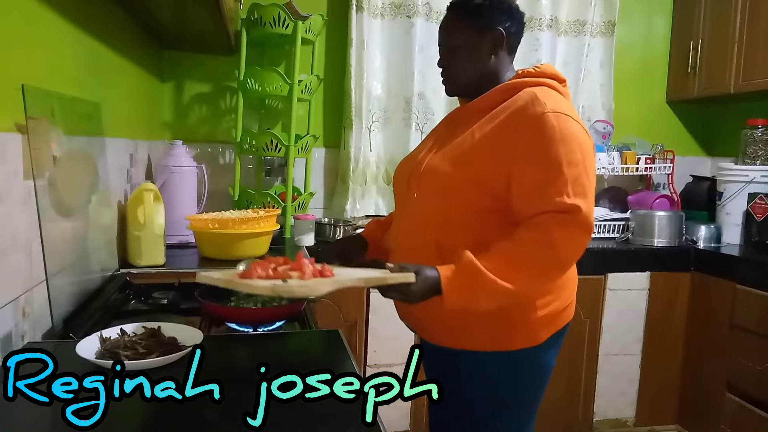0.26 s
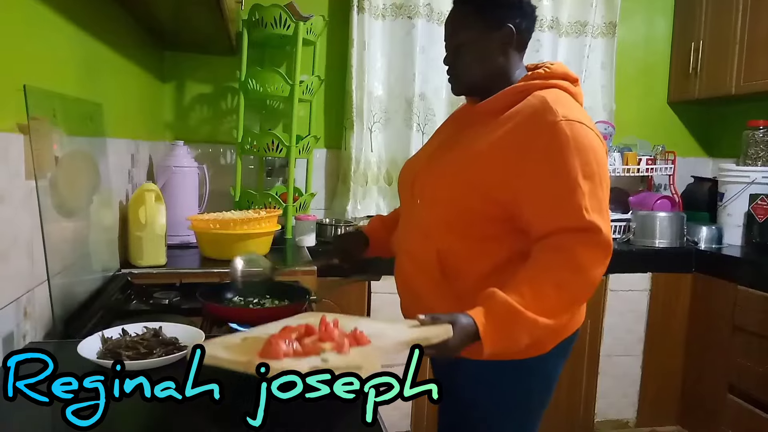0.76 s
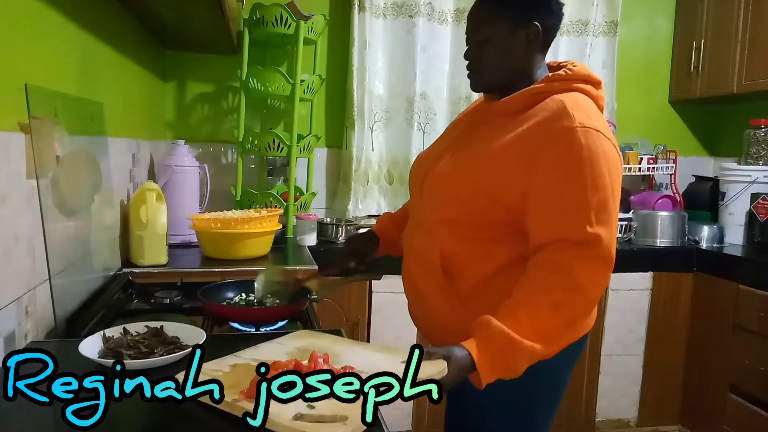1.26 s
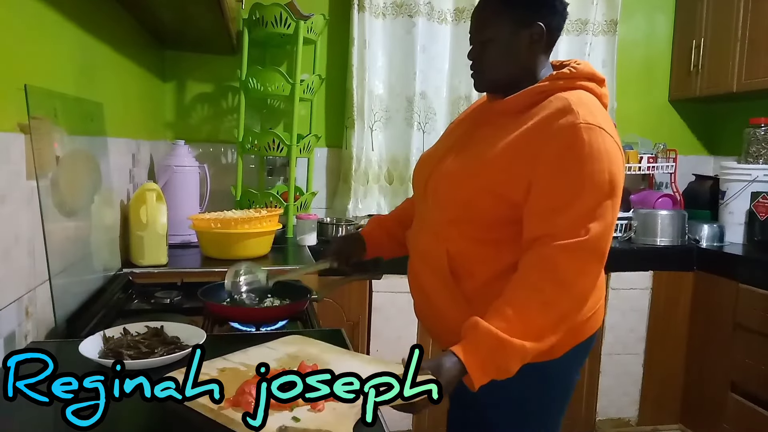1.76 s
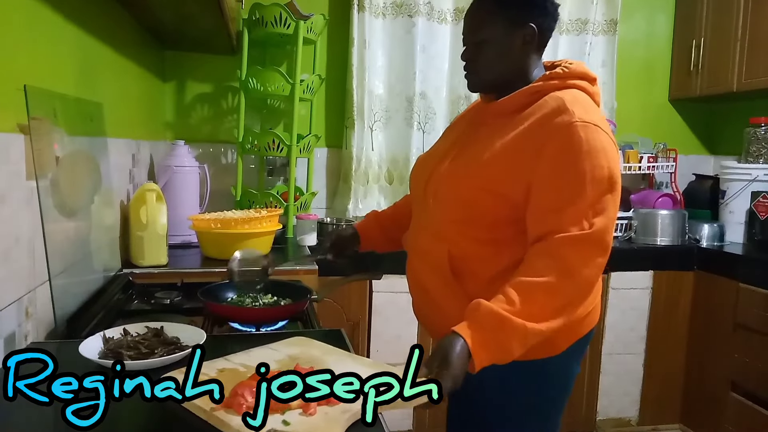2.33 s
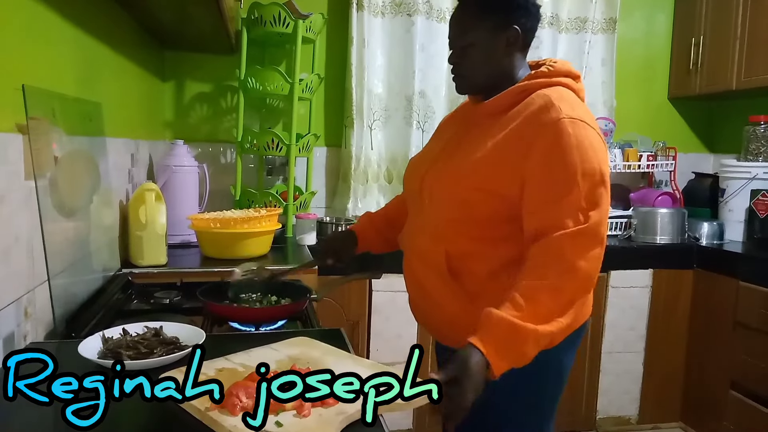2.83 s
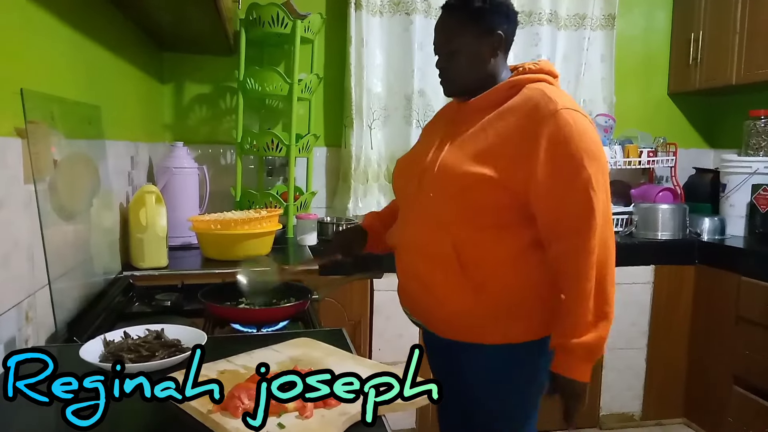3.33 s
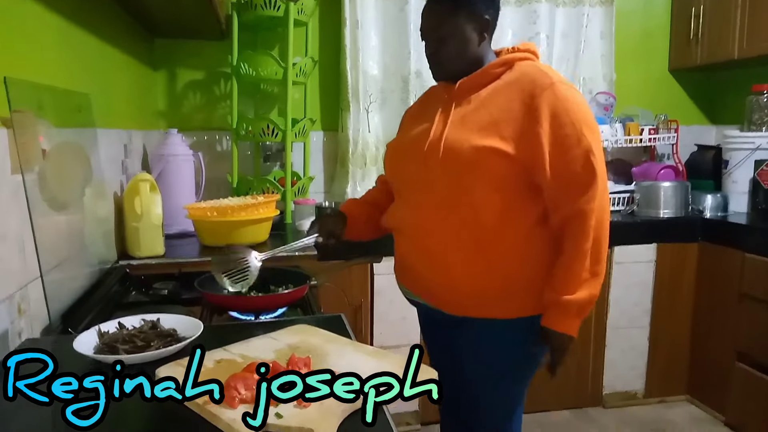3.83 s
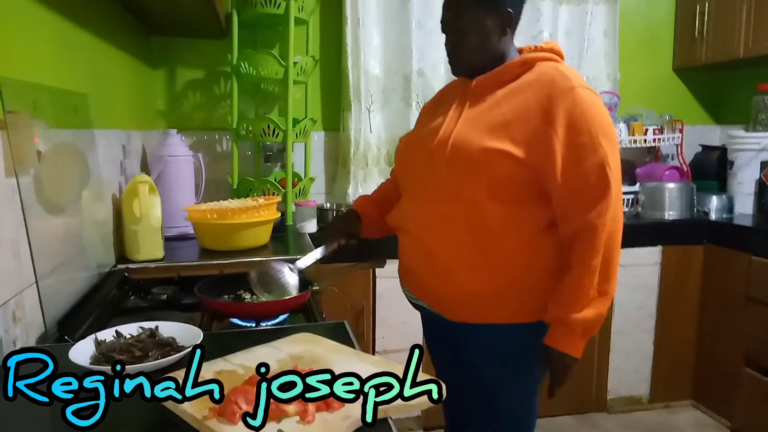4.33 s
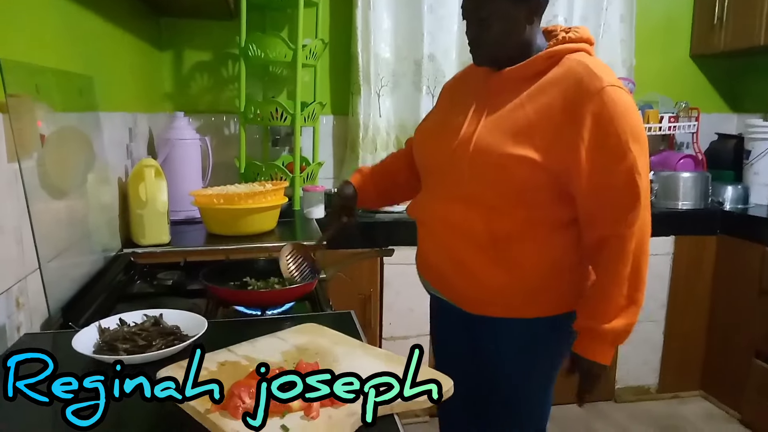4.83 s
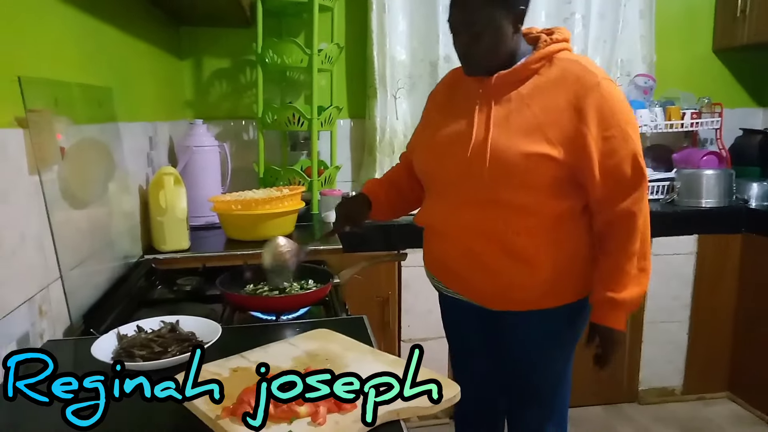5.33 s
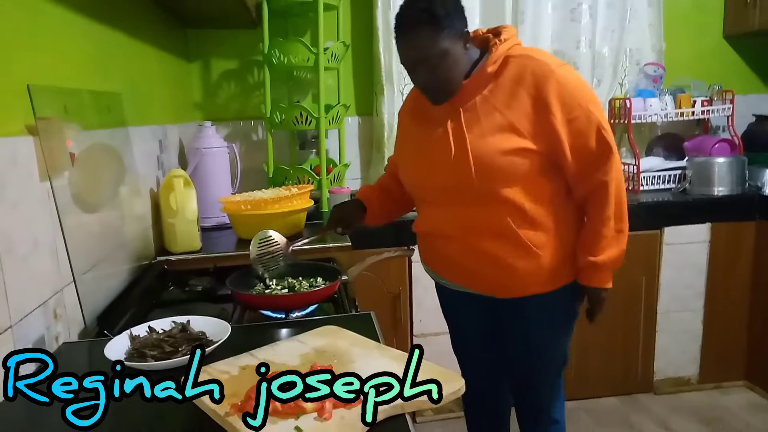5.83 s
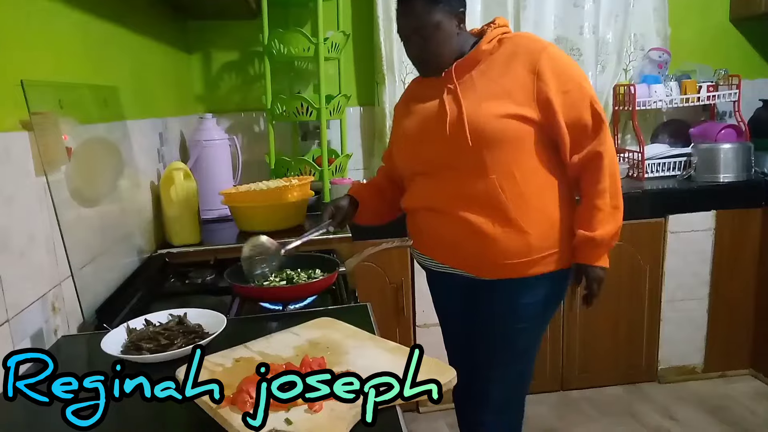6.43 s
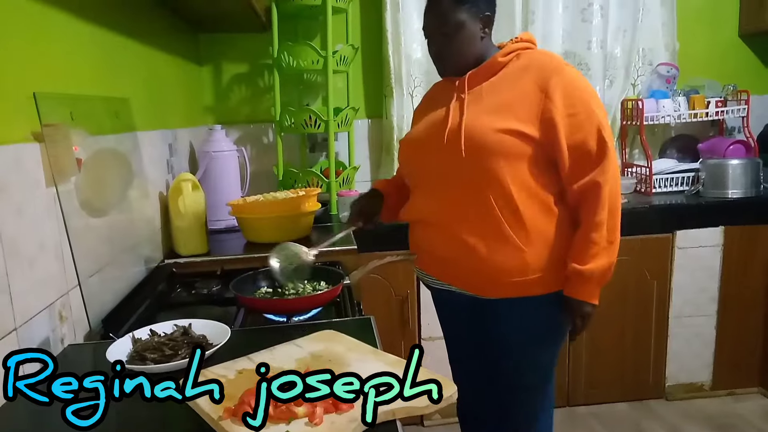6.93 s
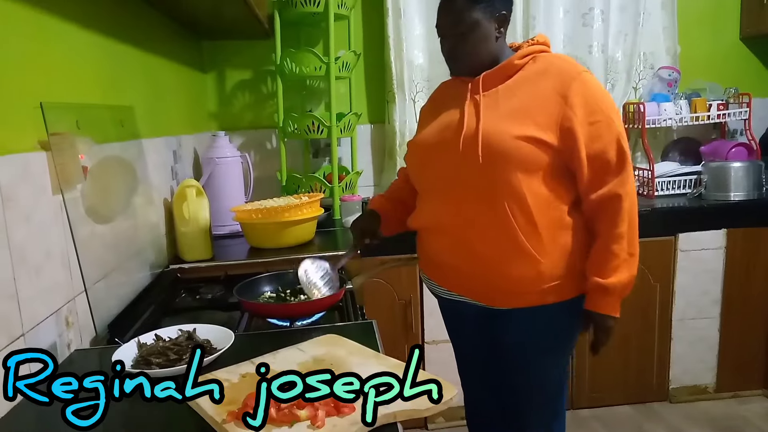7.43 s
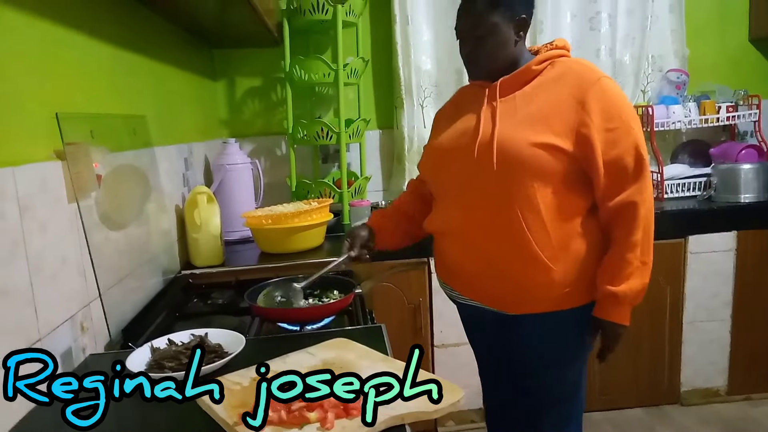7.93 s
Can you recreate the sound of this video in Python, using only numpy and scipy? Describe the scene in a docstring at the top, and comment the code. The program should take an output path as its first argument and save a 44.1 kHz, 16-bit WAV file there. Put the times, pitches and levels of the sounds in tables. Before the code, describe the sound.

Throughout about eight seconds, oil sizzles finely and quietly with small crackles over a soft, low gas-flame roar. A metal spoon clanks once in the pan at 0.4 s, with light brushing before and after. At about 1.0 s a wooden board touches, then lands with a hard hollow clack at 1.3 and rocks with a double knock near 1.55. Soft onion turning follows, with a tap at 2.6 and a stronger knock and scrape at 3.0. Lighter stirring leads to a low dragging contact at 3.9, a bright ringing clank at 4.35 and another at 4.65. From 5 to 6.3 mostly sizzle and faint rustles. Sharp knocks with scrapes come at 6.35 and 6.8, the brightest at 7.4, then smaller taps and drags at 7.65 to 7.8. Rings are short and choked; the room is small, hard and close, in mono.

```python
"""A slotted metal spoon lands in a frying pan and is dragged through onions: blows and friction grains ring
the modes of pan and spoon. Early on a wooden board is set down on the counter and rocks, driven the same way.
Oil sizzles as filtered clicks and ringing steam pockets; a gas flame roars over a rumble that answers blows.
A small hard kitchen adds a noise tail; one mono microphone, noise suppressor and cut top shape the sound."""
import sys
import numpy as np
from scipy import signal
from scipy.fft import rfft, irfft
from scipy.io import wavfile
from scipy.ndimage import uniform_filter1d

SR = 44100
rng = np.random.default_rng(int(sys.argv[2]) if len(sys.argv) > 2 else 0)


def materialize(psi):
    """Save the field psi as 16-bit PCM at rate SR to the path in sys.argv[1].

    A 1-D psi becomes a single channel; in a 2-D psi each row is a channel.
    """
    bounded = np.clip(np.atleast_2d(psi).T, -1, 1)
    quanta = np.round(bounded * 32767).astype(np.int16)
    wavfile.write(sys.argv[1], SR, quanta)


N = 360286   # samples


def from_db(db):
    """Gain of a level in dB."""
    return 10 ** (np.asarray(db) / 20)


def rms_one(x):
    """Scaled to rms 1."""
    return x / np.sqrt(np.mean(x ** 2) + 1e-20)


def at_hz(points, hz):
    """A table read on a log-frequency axis."""
    points_hz, values = np.transpose(points)
    return np.interp(np.log(hz), np.log(points_hz), values)


def bandpass(x, order, low_hz, high_hz):
    """Butterworth band."""
    return signal.sosfilt(signal.butter(order, [low_hz, high_hz], "band", fs=SR, output="sos"), x)


def colour(x, spectrum):
    """Causal filter shaped like the spectrum, unit energy (minimum phase from the folded cepstrum)."""
    size = 4096
    hz = np.maximum(np.fft.rfftfreq(size, 1 / SR), 1)
    cepstrum = irfft(at_hz(spectrum, hz) * np.log(10) / 20)
    cepstrum[1:size // 2] *= 2
    cepstrum[size // 2 + 1:] = 0
    response = irfft(np.exp(rfft(cepstrum)))
    return signal.fftconvolve(x, rms_one(response) / np.sqrt(size))[:N]


def drift(rate_hz):
    """Slow random wander of rms 1: noise through a two-pole lowpass, made at SR / 40."""
    r = np.exp(-80 * np.pi * rate_hz / SR)
    noise = rng.standard_normal(N // 40 + 2002)
    slow = signal.lfilter([1], [1, -2 * r, r * r], noise)[2000:]   # the start-up is dropped
    return np.interp(np.arange(N) / 40, np.arange(len(slow)), rms_one(slow))


def resonate(x, hz, width_hz):
    """One mode as a two-pole resonator; white noise of rms 1 comes out at rms 1."""
    r = np.exp(-np.pi * width_hz / SR)
    gain = np.sqrt((1 - r * r) / 2)
    return signal.lfilter([gain, 0, -gain], [1, -2 * r * np.cos(2 * np.pi * hz / SR), r * r], x + 1e-18)


def small_modes(count, low_hz, high_hz, spectrum, lift_db, width_hz):
    """Extra modes, unevenly spaced over the range, with levels read from the spectrum."""
    places = (np.arange(count) + rng.random(count)) / count
    return [(hz, width_hz, at_hz(spectrum, hz) + lift_db) for hz in low_hz + places * (high_hz - low_hz)]


def grains(per_s, spread_db):
    """Random clicks of uneven size and either sign, rms 1."""
    sizes = from_db(spread_db * np.minimum(rng.exponential(1, N), 4)) * rng.choice([-1, 1], N)
    return rms_one(sizes * (rng.random(N) < per_s / SR))


def swells(start_s, rise_s, hold_s, level_db, fade_db_per_s):
    """Gain over time of many rise-hold-fade shapes, added as powers."""
    power = np.zeros(N + SR)
    t = np.arange(SR) / SR
    for s, rise, hold, db, fade in np.broadcast(start_s, rise_s, hold_s, level_db, fade_db_per_s):
        fading_s = np.maximum(t - rise - hold, 0)
        shape = np.minimum(t / rise, 1) * from_db(db - fade * fading_s)
        power[round(s * SR):][:SR] += shape ** 2
    return np.sqrt(power[:N])


def shudders(events, grip_s, fade_share):
    """After each blow the contact shudders: one gain per zone, each with its own rise and share of the fade."""
    s, _, *zones_db, fade, _ = np.transpose(events)
    return [swells(s, grip, 0, db, fade * share) for db, grip, share in zip(zones_db, grip_s, fade_share)]


def blow_clicks(events, lift_db):
    """One single-sample click at the start of each event."""
    clicks = np.zeros(N)
    clicks[[round(row[0] * SR) for row in events]] = from_db(np.array(events)[:, 1] + lift_db)
    return clicks


def blows(events, lift_db, soft_hz, chatter_s):
    """Each blow is a soft contact that chatters for a few milliseconds."""
    clicks = blow_clicks(events, lift_db)
    fade = signal.lfilter([1], [1, -np.exp(-1 / (chatter_s * SR))], clicks)
    contact = clicks + 0.21 * fade * grains(per_s=2400, spread_db=-3.0)
    return signal.sosfilt(signal.butter(2, soft_hz, fs=SR, output="sos"), contact)


def body(forces, zones_hz, modes, grit, grit_db, wander_db):
    """Each zone of modes has its own force; the contact point moves, so each mode swells and fades.
    The many small modes blend into a broad grit."""
    out, broad = np.zeros(N), 0
    for k, (hz, width_hz, db) in enumerate(modes):
        force = forces[np.searchsorted(zones_hz, hz)]
        level_db = db + wander_db * np.tanh(drift(12.2))
        out += (-1) ** k * resonate(force * from_db(level_db), hz, width_hz)   # neighbours in opposite sign
    for force, low_hz, high_hz in zip(forces, [125] + zones_hz, zones_hz + [18000]):
        broad = broad + bandpass(force, 3, low_hz, high_hz)
    return out + from_db(grit_db) * colour(broad, grit)


# decay of the small hard kitchen: pitch_hz, t60_s
KITCHEN_T60 = [(100, 0.27), (260, 0.26), (700, 0.21), (1840, 0.14), (4850, 0.14), (12000, 0.099)]


def kitchen(x):
    """Diffuse tail: octave bands of noise, each dying at its own rate, starting after the first wall."""
    t = np.arange(SR // 2) / SR
    tail = 0
    for hz in 60 * 2.0 ** np.arange(8):
        band = bandpass(rng.standard_normal(len(t)), 2, hz, 2 * hz)
        tail = tail + band * from_db(-60 * t / at_hz(KITCHEN_T60, np.sqrt(2) * hz))
    tail *= np.clip((t - 0.003) / 0.013, 0, 1)
    return signal.fftconvolve(x, tail / np.sqrt(np.sum(tail ** 2)))[:N]


# colour of the gas flame: pitch_hz, level_db (relative, per Hz)
FLAME = [(53, -50.5), (90, 5.5), (259, 3), (637, -23), (700, -13), (910, -24.5), (1540, -120)]
FLAME_DB = -71.5
# the stove answers a blow late and slowly
SHAKE_RISE_S, SHAKE_DB_PER_S, SHAKE_REST_DB = 0.061, 107, -78


def stove():
    """Soft roar of the flame over a lumpy low rumble that swells after every blow."""
    roar = rms_one(colour(rng.standard_normal(N), FLAME))
    flame = roar * from_db(FLAME_DB + 3.0 * drift(5.9))
    low = bandpass(rng.standard_normal(N), 3, 58, 92)
    s, db = np.transpose([(row[0], row[-1]) for row in LANDINGS + KNOCKS])
    shake = from_db(SHAKE_REST_DB) + swells(s, SHAKE_RISE_S, 0, db, SHAKE_DB_PER_S)
    return flame + rms_one(low) * shake * from_db(4.6 * drift(4.0))


# colour of the coarser fizz, also of the steam pockets: pitch_hz, level_db (relative, per Hz)
FIZZ = [(240, -33), (400, -11), (636, -13), (828, -7), (1240, -10), (2150, -8), (4070, -4), (8000, -3.5),
        (10400, -6.5), (17600, -120)]


def bubbles(per_s, width_hz):
    """Larger steam pockets under the onions burst and ring briefly, each at its own pitch."""
    count, out = 24, 0
    modes = small_modes(count, low_hz=1227, high_hz=8190, spectrum=FIZZ, lift_db=0, width_hz=width_hz)
    for hz, width_hz, db in modes:
        clicks = abs(grains(per_s / count, spread_db=5.5))
        burst = signal.lfilter([1], [1, -0.995], clicks)   # each burst lasts some ms
        out = out + from_db(db) * resonate(burst * rng.standard_normal(N), hz, width_hz)
    return rms_one(out)


# sizzle over time: start_s, hiss_db, fizz_db (before the flicker)
SIZZLE = [(0.0, -56, -56), (0.7, -52, -52), (1.702, -51, -50), (2.999, -52, -52), (4.6, -52.5, -49.5),
          (5.9, -50.5, -53.5), (6.546, -53.5, -54.5), (7.8, -49.5, -53.5), (8.17, -52.5, -55)]
# colour of the fine hiss: pitch_hz, level_db (relative, per Hz)
HISS = [(4120, -23.5), (7000, -28.5), (8090, -32), (8880, 3.5), (9630, 7), (10300, 5.5), (11400, 3),
        (13500, -15.5), (14800, 5.5), (15600, -6)]


def oil():
    """Thousands of tiny steam bursts: a fine hiss and a coarser fizz, both flickering."""
    t = np.arange(N) / SR
    s, hiss_db, fizz_db = np.transpose(SIZZLE)
    dense = grains(per_s=SR, spread_db=5.5)   # a click on every sample
    hiss = rms_one(colour(dense, HISS + [(16000, -11.0)]))
    pockets = from_db(-10) * bubbles(per_s=500, width_hz=11.833)
    fizz = rms_one(colour(grains(per_s=5300, spread_db=1.5), FIZZ)) + pockets
    hiss_flicker_db, fizz_flicker_db = 1.6 * drift(10), 1.6 * drift(11)
    return (hiss * from_db(np.interp(t, s, hiss_db) + hiss_flicker_db)
            + fizz * from_db(np.interp(t, s, fizz_db) + fizz_flicker_db))


# the board knocks and rattles: start_s, blow_db, boom_db, wood_db, edge_db (rattle in three zones),
# fade_db_per_s, stove_shake_db; levels are relative
KNOCKS = [(0.984, -21, -33, -26.5, -37.5, 219.5, -54), (1.227, -31, -37.5, -32, -37, 104, -51),
          (1.311, -12.5, -28.5, -10, -24, 170.5, -37), (1.323, -21, -30.5, -24, -30.5, 175, -46),
          (1.343, -22, -27, -16, -27.5, 177, -40.5), (1.532, -15, -20.5, -16.5, -37.5, 196.5, -49),
          (1.545, -17.5, -33, -21.5, -41.5, 195, -60), (1.572, -17.5, -23.5, -24, -37, 183.5, -44)]
# board and counter modes: pitch_hz, width_hz, level_db (relative)
BOARD = [(80, 23, -9.5), (112, 13, 3), (270.7, 31, -1.5), (351, 15.5, -7.5), (533, 35, -1.5),
         (526, 12, -2.5), (595, 40, -2), (687, 45, -1), (775, 60, 0), (880, 55, 0), (1026, 40, -5),
         (1294, 41, -5.5), (1292, 63, -6.5), (1458, 46, -11.5), (2030, 45, -18.5)]
# colour of the broad wooden grit: pitch_hz, level_db (relative, per Hz)
WOOD_GRIT = [(24, -32), (40, -14), (108, -12.5), (369, -8), (404, -9), (761, -1.5), (999, 3), (2060, -13.5),
             (4200, -29), (9000, -63.5), (11700, -91.5), (19800, -120)]
# borders between the mode zones: pitch_hz
BOARD_ZONES_HZ = [400, 1800]
# rattle in each zone, low to high: rise_s; share of the fade rate (no unit)
BOARD_GRIP_S = [0.011, 0.0015, 0.0067]
BOARD_FADE_SHARE = [0.95, 1, 1.15]


def board():
    """Knocks and the rattle of the rocking board drive board and counter."""
    boom, wood, edge = shudders(KNOCKS, BOARD_GRIP_S, BOARD_FADE_SHARE)
    rub = grains(per_s=2400, spread_db=-2.5) * from_db(-19.0)
    knock = blows(KNOCKS, lift_db=4.0, soft_hz=1500, chatter_s=0.0054)
    forces = [rub * boom * from_db(4.5) + knock * from_db(-1.0),
              rub * wood + knock,
              rub * edge * from_db(20.5) + knock]
    extra = small_modes(count=24, low_hz=903, high_hz=4430, spectrum=WOOD_GRIT, lift_db=-6.0, width_hz=170)
    clack = from_db(-1.5) * resonate(knock, hz=1510, width_hz=650)   # hard edge on hard counter
    return clack + body(forces, BOARD_ZONES_HZ, BOARD + extra, WOOD_GRIT, grit_db=11.5, wander_db=-0.5)


# clear rings of one mode of spoon, pan or counter, choked by the next contact:
# start_s, level_db (before swell and tremble), pitch_hz, t60_s, held_s (until the choke)
PINGS = [(.525, -31, 2420, 0.33, .07), (0.779, -40.5, 2750, 0.052, .1), (1.232, -31.5, 161, 0.56, 0.054),
         (1.228, -31.5, 840, 0.17, 0.062), (7.06, -40, 207.5, 0.48, 0.097), (1.311, -26, 105.8, 0.23, 0.13),
         (1.311, -19, 1510, 0.15, .1), (1.312, -30, 2004, 0.21, .1), (1.535, -25.5, 113.1, 0.6, 0.26),
         (1.551, -38, 4600, 0.21, 0.067), (1.79, -42, 2010, 0.18, 0.11), (2.001, -45.5, 4290, 0.2, 0.094),
         (2.12, -33.5, 1510, 0.058, 0.12), (2.612, -28, 5740, 0.1, 0.11), (2.613, -37, 2370, 0.99, 0.11),
         (2.91, -37.5, 1430, 0.044, 0.018), (2.966, -26, 5700, 0.12, .04), (3.263, -54, 1460, 0.17, 0.056),
         (3.49, -49.5, 1960, 0.42, 0.15), (3.921, -32.5, 163, 0.78, 0.24), (4.157, -38, 4550, 0.12, 0.095),
         (4.171, -48, 3420, 0.26, .1), (4.323, -30, 159, 0.63, 0.27), (4.345, -29, 2423, 0.62, 0.18),
         (4.354, -26.5, 2574, 0.31, 0.063), (4.345, -25.5, 5960, 0.17, .2), (4.647, -25, 1033, 0.16, 0.05),
         (4.657, -36, 2430, 0.41, 0.11), (4.656, -33, 160, 0.63, 0.23), (6.356, -29, 6000, 0.21, 0.12),
         (6.352, -31, 7380, 0.16, 0.075), (6.355, -28.5, 2440, 0.22, .15), (6.428, -39, 1250, 0.38, 0.11),
         (6.874, -41, 1790, 1.2, 0.2), (6.915, -36, 1316, 0.84, .17), (6.995, -29, 980, 0.37, 0.15),
         (7.379, -36.5, 166, 0.41, .19), (6.359, -41, 163.7, .5, 0.27), (7.637, -33.5, 2540, 0.25, .15),
         (7.643, -31.5, 162, 0.86, 0.27), (7.734, -30.5, 985, 0.26, 0.051), (7.835, -37, 2640, 0.4, 0.12),
         (7.859, -34.5, 1170, 0.25, 0.17), (7.93, -57.5, 800, 13, 0.19)]
CHOKE_DB_PER_S = 1199.5


def pings(swell_s, swell_cycles, tremble_db, waver):
    """A mode swells (low ones more slowly), trembles and wavers with the contact, dies away and is choked."""
    out, tremble = np.zeros(N), from_db(tremble_db * drift(50))
    clock = np.cumsum(1 + waver * drift(30)) / SR   # uneven time makes the pitch waver
    for s, db, hz, t60, held in PINGS:
        start = round(s * SR)
        t = np.arange(N - start)[:SR // 2] / SR
        level_db = db - 60 * t / t60 - CHOKE_DB_PER_S * np.maximum(t - held, 0)
        swell = 1 - np.exp(-t / (swell_s + swell_cycles / hz))
        tone = np.sin(2 * np.pi * hz * clock[start:][:SR // 2])
        out[start:][:SR // 2] += from_db(level_db) * swell * tone
    return out * tremble


KNOCK_START_HZ, KNOCK_END_HZ, KNOCK_FALL_S, KNOCK_T60_S = 1232, 754, 0.005, 0.045


def bowl_knock(lift_db):
    """The spoon bowl answers each landing with a short knock that falls in pitch."""
    t = np.arange(SR // 10) / SR
    hz = KNOCK_END_HZ + (KNOCK_START_HZ - KNOCK_END_HZ) * np.exp(-t / KNOCK_FALL_S)
    knock = from_db(-60 * t / KNOCK_T60_S) * np.sin(2 * np.pi * np.cumsum(hz) / SR)
    return signal.fftconvolve(blow_clicks(LANDINGS, lift_db), knock)[:N]


# the spoon lands and shudders on the metal: start_s, blow_db, floor_db, wall_db, rim_db, edge_db
# (shudder on pan floor, wall, rim and spoon edge), fade_db_per_s, stove_shake_db; levels are relative
LANDINGS = [(0.122, -54, -60, -80, -84, -82, 100, -64), (0.334, -48.5, -79, -69, -40.5, -43.5, 282, -84),
            (0.431, -27.5, -32.5, -23.5, -37, -38.5, 174, -49),
            (0.77, -46, -83, -63, -49.5, -48, 142, -62.5), (1.787, -52, -66, -76, -43, -50, 142, -68),
            (2.119, -42, -60, -91, -40.5, -52, 245, -85), (2.304, -42.5, -59, -55, -43.5, -54.5, 135, -64),
            (2.609, -24, -32, -21, -32, -45, 133, -77),
            (2.966, -18.5, -29.5, -20.5, -25, -34.5, 127, -44.5),
            (3.487, -65, -63, -76, -64, -78, 158, -72), (3.912, -42, -31, -28, -29.5, -40, 124, -52),
            (4.318, -29, -35, -25, -55, -42, 400, -73), (4.343, -23.5, -37.5, -26.5, -25.5, -27, 133, -60),
            (4.654, -21, -29, -24, -42, -38.5, 152, -57), (6.353, -22, -32, -26, -27.5, -37.5, 150, -55),
            (6.786, -22.5, -34, -28, -34, -54, 128, -52), (7.374, -20, -29.5, -24, -18.5, -28, 177, -54),
            (7.637, -36, -49, -29.5, -36, -37.5, 116, -53), (7.734, -34, -41, -48, -28, -41, 151, -46)]
# the spoon is dragged through the pan: start_s, rise_s, hold_s, lift_off_db_per_s (before the zone share),
# floor_db, wall_db, rim_db, edge_db (relative)
DRAGS = [(0.425, 0.11, 0.023, 291, -42, -33.5, -32.5, -36), (2.608, 0.06, 0.038, 138, -42, -37, -31.5, -41),
         (2.772, 0.036, 0.015, 506, -74, -67, -43, -51), (3.001, 0.1, 0.0083, 125, -39.5, -31, -28.5, -36),
         (3.935, 0.083, 0.024, 307, -41.5, -35, -38, -39), (4.438, 0.043, 0.025, 250, -72, -56, -46, -49),
         (4.724, 0.055, 0.046, 349, -62, -51, -44.5, -48.5),
         (6.395, 0.041, 0.013, 279.5, -53, -36.5, -36.5, -49.5),
         (6.5, 0.019, 0.013, 404, -73, -57, -46, -50.5), (6.807, 0.17, 0.03, 278, -37, -29.5, -35.5, -47.5),
         (7.664, 0.059, 0.019, 191, -34.5, -29, -36, -66), (7.776, 0.077, 0.024, 299, -66, -40.5, -37, -39)]
# the spoon turns the onions, barely touching metal: start_s, rise_s, hold_s, rim_db, edge_db (relative)
TOSSES = [(0.002, 0.0048, 0.018, -64, -49.5), (0.076, 0.0073, 0.024, -48, -52.5),
          (0.239, 0.0044, 0.017, -65, -53), (0.863, 0.017, 0.016, -54, -81),
          (1.008, 0.024, 0.023, -39.5, -49), (1.44, 0.041, 0.029, -41.5, -53), (1.53, 0.025, .02, -52, -68),
          (1.593, 0.028, 0.034, -42.5, -48), (1.886, 0.028, 0.023, -55.5, -50.5),
          (1.973, 0.05, 0.089, -49.5, -52.5), (2.51, 0.08, 0.017, -48, -52),
          (3.244, 0.016, 0.023, -86, -56), (3.325, 0.05, 0.019, -53, -50.5),
          (3.448, 0.046, 0.053, -51, -55), (3.645, 0.021, 0.037, -53, -55.5),
          (3.8, 0.095, 0.034, -46.5, -52), (4.144, 0.028, 0.01, -52.5, -56),
          (4.996, 0.016, 0.021, -48, -61), (5.17, 0.031, 0.035, -52.5, -63.5),
          (5.805, 0.042, 0.023, -54, -55.5), (5.938, 0.14, 0.025, -42, -49),
          (6.646, .03, 0.029, -52.5, -67), (7.21, 0.043, 0.2, -54.5, -60)]
TOSS_DB_PER_S = 224.5   # dying of a toss
# pan and spoon modes: pitch_hz, width_hz, level_db (relative)
PAN = [(160.8, 29, -6.5), (231.9, 7.4, -7), (680, 40, -10.5), (794.6, 12, -8.5), (820, 140, -3),
       (999, 73, -1), (1080, 88, 0), (1221, 30, -0.5), (1344, 120, 0.5), (1441, 42, -3), (1787, 27, -7),
       (2220, 72, -20), (2376, 80, 2), (2422, 75, 3.5), (2622, 70, -4), (2875, 20, -6.5), (3870, 370, -7.5),
       (4170, 94, -6), (4440, 23, -10.5), (5006, 89, -4), (5480, 27, -4.5), (5727, 45, -3.5),
       (5906, 59, -2), (5970, 70, -2), (6714, 53, -7.5), (7230, 46, -7), (7950, 99, -9), (10170, 1200, 0.5)]
# colour of the broad metal grit: pitch_hz, level_db (relative, per Hz)
METAL_GRIT = [(24, -45), (40, -17.5), (156, -4.5), (270, -6), (400, -12), (600, -8), (2060, -10.5),
              (2450, -9.5), (3220, -12.5), (5850, -18), (15000, -23)]
# borders between the mode zones: pitch_hz
PAN_ZONES_HZ = [400, 1280, 3300, 5100, 8500]
# shudder on floor, wall, rim, edge: rise_s; share of the fade rate (no unit)
PAN_GRIP_S = [0.01, 0.0033, 0.0046, 0.017]
PAN_FADE_SHARE = [1.2, 1.08, 1.27, 1.64]
# drag on floor, wall, rim, edge: share of the lift-off rate (no unit)
LIFT_SHARE = [.7, .85, 1.05, 1.1]


def spoon():
    """Friction grains and single landings drive the same pan; a light toss wakes mainly the upper modes."""
    s, rise, hold, lift, *zones_db = np.transpose(DRAGS)
    drags = [swells(s, rise, hold, db, lift * share) for db, share in zip(zones_db, LIFT_SHARE)]
    jolts = shudders(LANDINGS, PAN_GRIP_S, PAN_FADE_SHARE)
    floor, wall, rim, edge = np.hypot(drags, jolts)
    # sliding wakes the lower edge modes more than a blow does, and less of the very top
    slots = np.hypot(drags[-1] * from_db(2.0), jolts[-1] * from_db(-3.5))
    top = jolts[-1] * from_db(4.0) + drags[-1] * from_db(3)
    s, rise, hold, *zones_db = np.transpose(TOSSES)
    toss_rim, toss_edge = [swells(s, rise, hold, db, TOSS_DB_PER_S) for db in zones_db]
    stick_slip_db = 2.43 * drift(45)
    friction = grains(per_s=3000, spread_db=3.0) * from_db(-13.5 + stick_slip_db)
    edge = edge * from_db(1.5 * drift(30))   # the slotted edge catches unevenly
    tap = blows(LANDINGS, lift_db=2.0, soft_hz=1820, chatter_s=0.0064)
    forces = [friction * floor * from_db(8.5) + tap * from_db(-3.0),
              friction * (wall * from_db(-0.5) + toss_rim * from_db(-30.0)) + tap,
              friction * (rim + toss_rim) + tap,
              friction * (slots + toss_edge) * from_db(6.0) + tap * from_db(-14.5),
              friction * (edge + toss_edge) * from_db(7) + tap * from_db(-13.5),
              friction * (top + toss_edge * from_db(7.0)) + tap]
    extra = small_modes(count=30, low_hz=1452.0, high_hz=7982, spectrum=METAL_GRIT, lift_db=7.0, width_hz=70)
    ringing = body(forces, PAN_ZONES_HZ, PAN + extra, METAL_GRIT, grit_db=7.0, wander_db=4.0)
    return bowl_knock(lift_db=-2.5) + ringing


KITCHEN_DB = -8.5


def scene():
    """Everything reaches one microphone; spoon and board also wake the room."""
    close = spoon() + board()
    rings = pings(swell_s=0.0018, swell_cycles=1.9, tremble_db=3.5, waver=0.00695)
    mono = close + rings + from_db(KITCHEN_DB) * kitchen(close) + oil() + stove()
    return np.array([mono, mono])


def suppressor(x, memory_s, strength, least_db, bass_least_db, bass_hz):
    """Turns each band down the more its power drops under its recent mean; the bass may sink furthest."""
    hz, _, spectrum = signal.stft(x, SR, nperseg=512)
    power = uniform_filter1d(abs(spectrum) ** 2, size=3, axis=0)
    power = uniform_filter1d(power, size=3, axis=1) + 1e-18
    keep = np.exp(-256 / SR / memory_s)   # 256 samples per hop
    recent = signal.lfilter([1 - keep], [1, -keep], power, axis=1, zi=keep * power[:, :1])[0]
    least = from_db(least_db + (bass_least_db - least_db) / (1 + (hz[:, None] / bass_hz) ** 2))
    gain = np.sqrt(np.clip(1 - strength * recent / power, least ** 2, 1))
    return signal.istft(spectrum * gain, nperseg=512)[1][:N]


CUTOFF_HZ = 15640


def record(dry):
    """Noise suppressor, thin bass, cut top."""
    clean = suppressor(dry[0], memory_s=0.23, strength=0.094, least_db=-2.5, bass_least_db=-3.5, bass_hz=800)
    thin = signal.sosfilt(signal.butter(3, 52, "high", fs=SR, output="sos"), np.array([clean, clean]))
    return signal.sosfilt(signal.cheby2(20, 90, CUTOFF_HZ, fs=SR, output="sos"), thin)


dry = scene()
out = record(dry)
materialize(out)
```